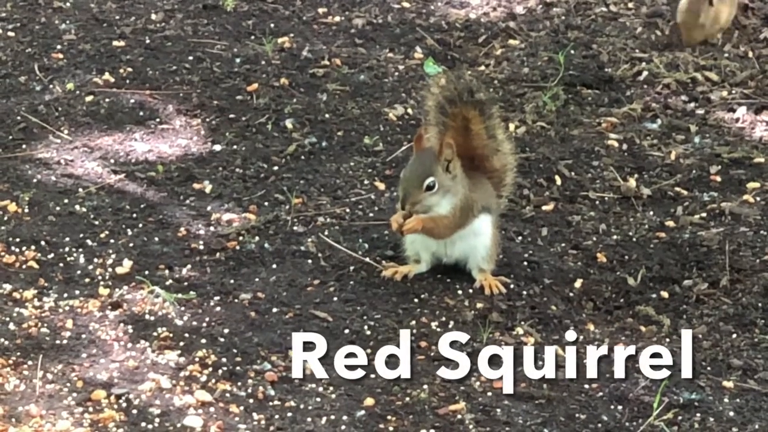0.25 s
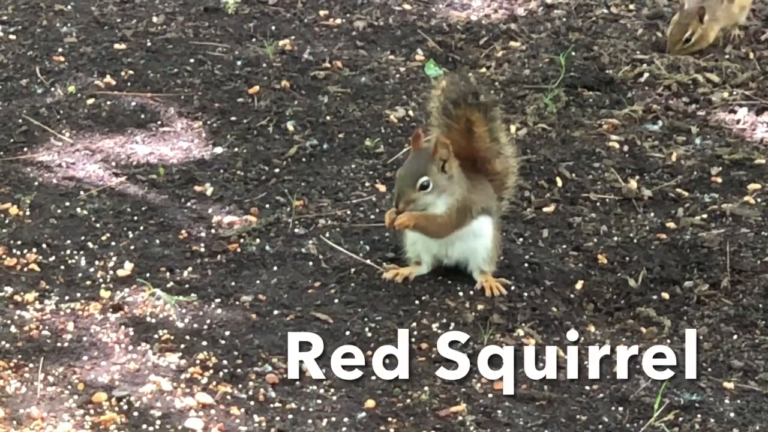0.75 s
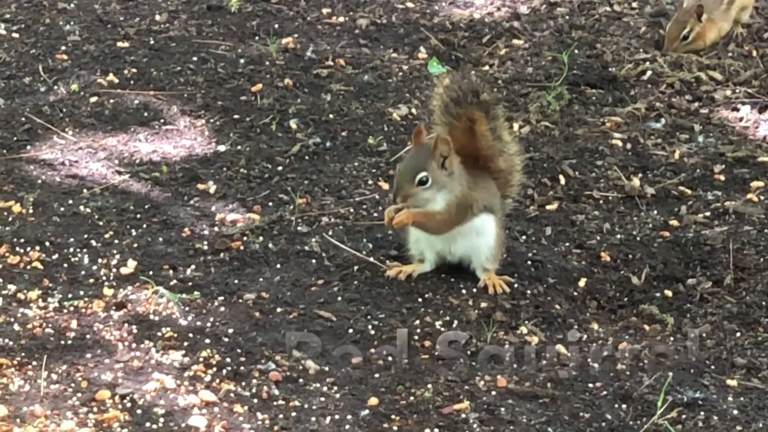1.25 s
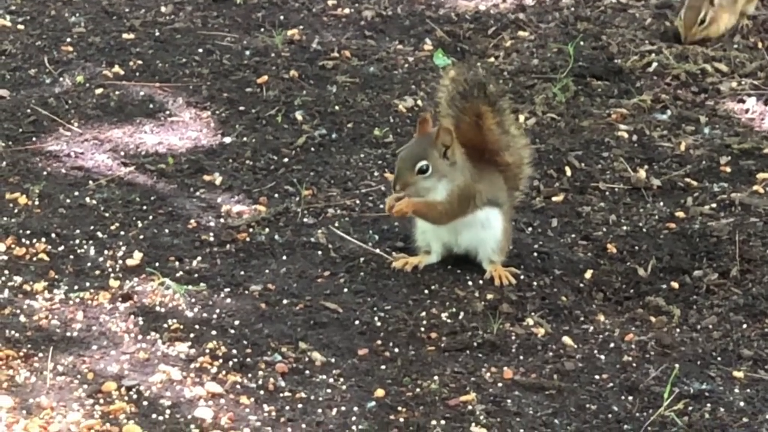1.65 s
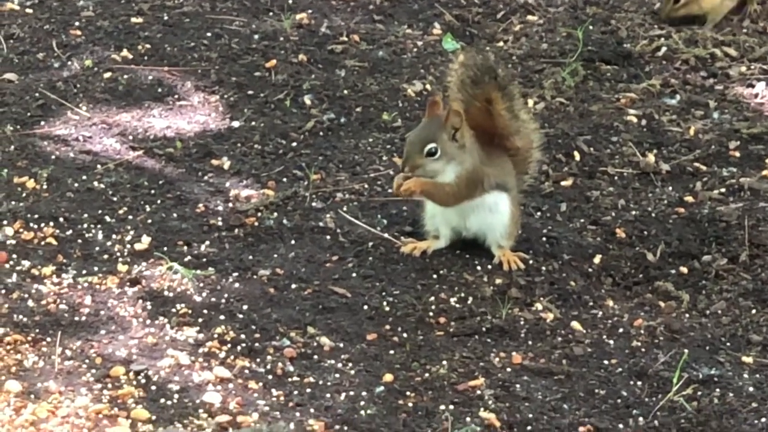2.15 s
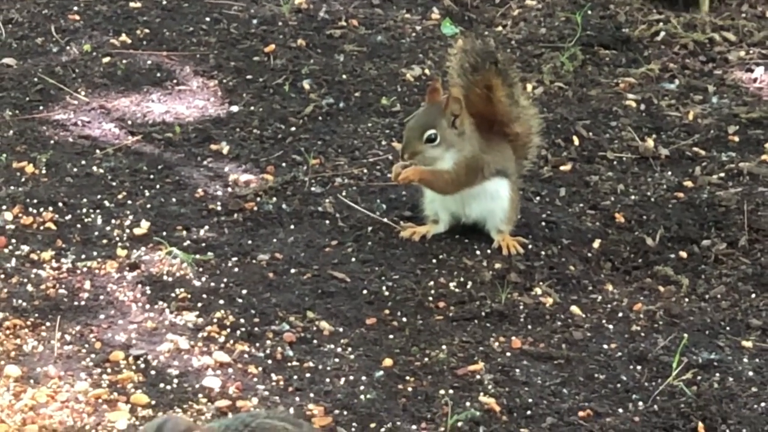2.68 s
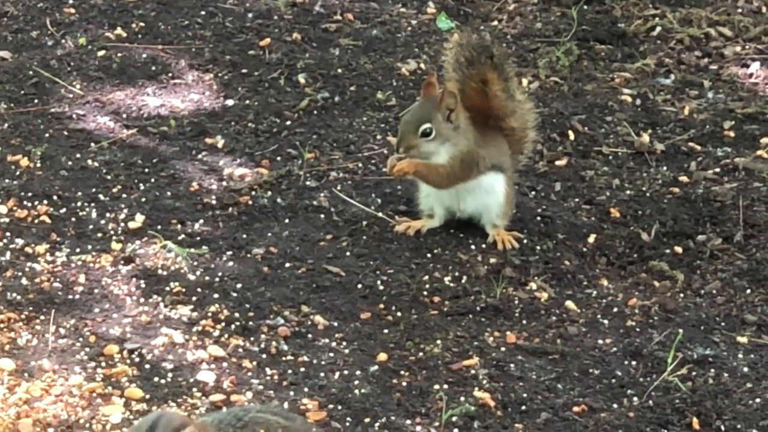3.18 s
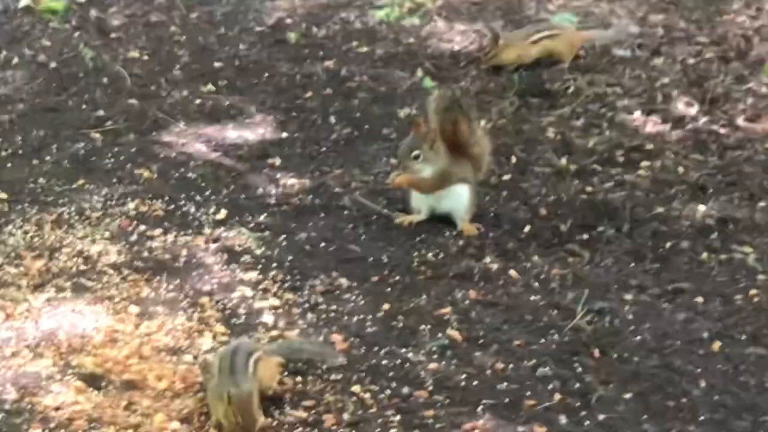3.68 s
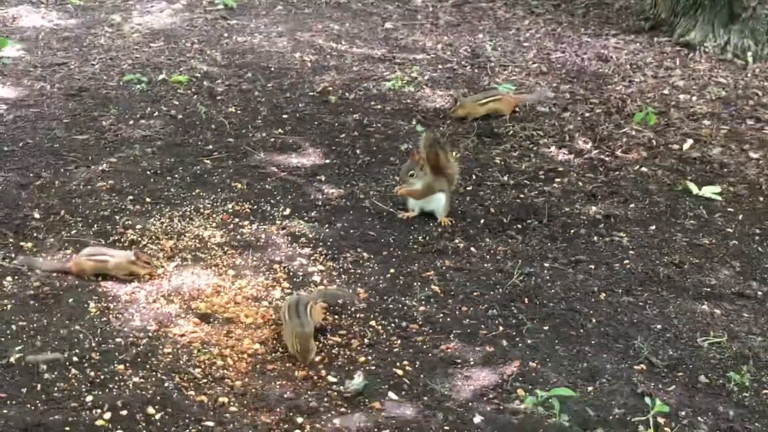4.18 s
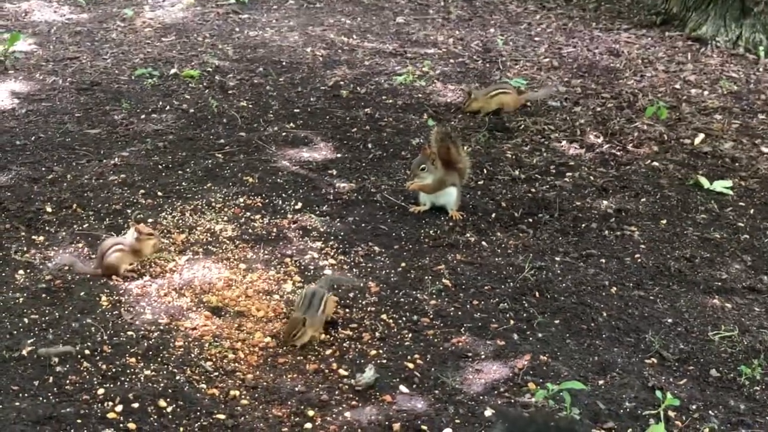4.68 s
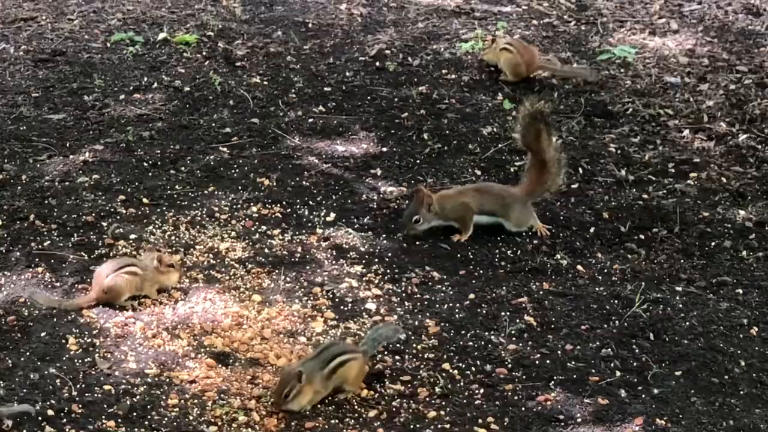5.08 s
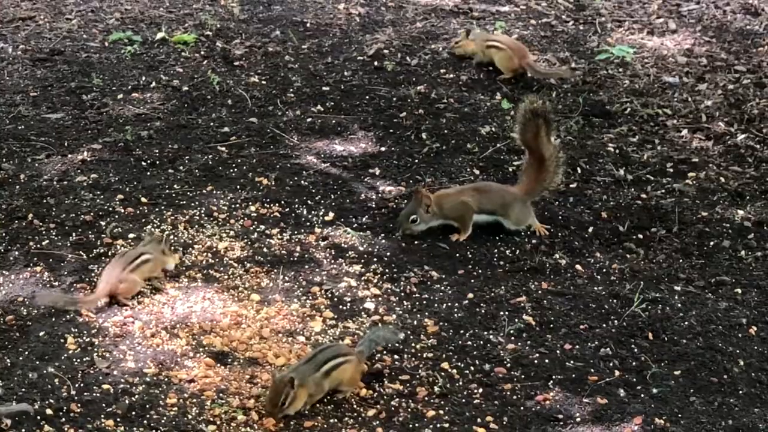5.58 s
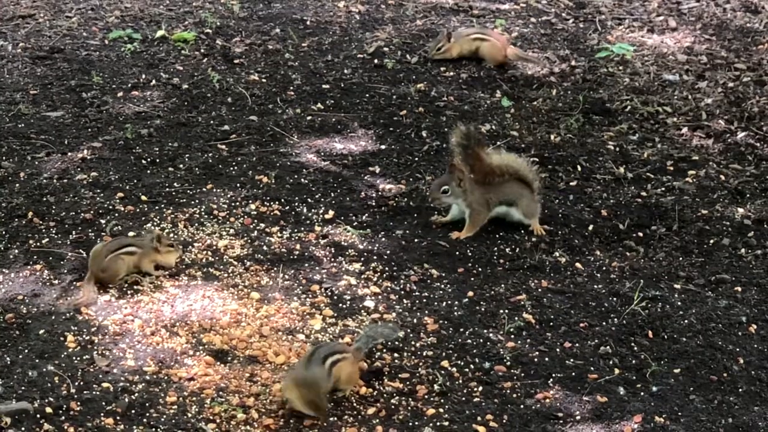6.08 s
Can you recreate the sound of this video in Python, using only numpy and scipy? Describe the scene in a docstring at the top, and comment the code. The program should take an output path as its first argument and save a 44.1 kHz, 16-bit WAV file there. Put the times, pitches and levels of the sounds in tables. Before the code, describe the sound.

A quiet outdoor yard has a soft low wash, faint distant traffic drone and scattered echoes from trees. From 0 to 1.6 s, far jays give short, faint rising calls. A soft chirp at 0.4 s leads into close squirrel chatter from 0.5 to 2.2 s: throaty, raspy groups of two to five pulses, about six groups a second, with increasingly hissy puffs. Dry litter rustles near 0.9 s. A near jay screams harshly at 2.1 s, sagging slightly in pitch. Thin, wavering songbird whistles are scattered between 1.7 and 3.9 s, with crisp rustling at 2.7 and strongest near 4 s. The jay screams again at 4.3 s and at 4.9 s, the last chopped at 5.05 s as the ambience dips, then recovers. From 5.6 s to the end near 6.3 s, louder, quicker squirrel chatter alternates tiny clipped pulses with rattling bursts and brief high squeaks.

```python
"""Squirrel chatter and jay screams in a yard

A squirrel chatters close by: strings of short throaty tone pulses with rasp and puffs of air.
A jay screams three times, as two beating stacks of harmonics; a splice cuts the third near its end.
Far off, jays call shortly, songbirds whistle, one faint low note may be a jay; paws rustle the litter.
An outdoor wash of noise and two drone bands of distant traffic lie beneath; noise tails echo the voices."""
import sys
import numpy as np
from scipy import signal
from scipy.fft import rfft, irfft
from scipy.io import wavfile
from scipy.ndimage import uniform_filter1d

SR = 44100
rng = np.random.default_rng(int(sys.argv[2]) if len(sys.argv) > 2 else 0)


def wav_record(signal):
    """Record a signal, one row per channel, as 16-bit PCM in the file named by sys.argv[1]."""
    frames = np.transpose(np.atleast_2d(signal))
    bounded = np.clip(frames, -1, 1)
    # unit amplitude maps onto the largest positive 16-bit level
    quanta = np.round(bounded * 32767).astype(np.int16)
    wavfile.write(sys.argv[1], SR, quanta)


N = 279594  # samples

SPLICE_S, EDGE_HZ = 5.05, 15800


def amp(db):
    """Amplitude factor of a level in dB."""
    return 10 ** (np.asarray(db) / 20)


def evened(x):
    """Scales to rms 1."""
    return x / np.sqrt(np.mean(x ** 2) + 1e-20)


def read(points, hz):
    """Interpolates a (hz, value) table over log frequency."""
    point_hz, value = np.transpose(points)
    return np.interp(np.log(hz + 1), np.log(point_hz + 1), value)


def add(mix, start_s, sound):
    """Adds a sound to the mix in place, clipped at the mix's end."""
    part = mix[round(start_s * SR):][:len(sound)]
    part += sound[:len(part)]


def noise(colour):
    """Steady noise of the given spectrum, rms 1."""
    spectrum = rfft(rng.standard_normal(N)) * amp(read(colour, np.fft.rfftfreq(N, 1 / SR)))
    return evened(irfft(spectrum, N))


def drift(n, span_s):
    """Smooth random curve of unit spread: white noise averaged twice over the span."""
    span = max(round(span_s * SR), 2)
    smooth = uniform_filter1d(uniform_filter1d(rng.standard_normal(n), span), span)
    return smooth * np.sqrt(1.5 * span)


def stack(pitch_hz, orders):
    """Harmonics (multiple, level_db) of a pitch curve, rms 1."""
    turns = np.cumsum(pitch_hz) / SR
    return evened(sum(amp(db) * np.sin(2 * np.pi * round(k) * turns) for k, db in orders))


# outdoor wash, relative spectrum: frequency_hz, level_db_per_hz
AIR_SPECTRUM = [(18, -38), (30, -8), (112, 0.5), (319, -12), (461, -15.5), (888, -19), (1850, -24.5),
                (2470, -30.5), (3130, -27.5), (3480, -27.5), (16000, -43)]
# traffic drone resonances: centre_hz, width_hz, level_db
DRONE_BANDS = [(91, 31, -53), (192.4, 21, -53)]


def yard():
    """Outdoor wash that swells slowly, with two drone bands that noise excites and so makes waver."""
    hz, white = np.fft.rfftfreq(N, 1 / SR), rfft(rng.standard_normal(N))
    drone = np.zeros(N)
    for centre_hz, width_hz, level_db in DRONE_BANDS:
        resonance = 1 / (1 + ((hz - centre_hz) / (width_hz / 2)) ** 2)
        drone += amp(level_db) * evened(irfft(white * resonance, N))
    wash_db = -43.5 + 0.6 * drift(N, 0.1)
    return amp(wash_db) * noise(AIR_SPECTRUM) + drone


# far notes: songbird whistles, and one faint low note that may be a jay; levels before veiling:
# start_s, length_s, level_db, early_hz, late_hz
FAR_NOTES = [(1.651, 0.11, -58, 3580, 3580), (1.878, 0.11, -50, 3540, 3820), (2.373, 0.18, -58, 6940, 6970),
             (2.467, 0.072, -50, 2860, 2720), (2.602, 0.12, -54, 2316, 2233),
             (2.608, 0.092, -48, 3310, 3810), (2.683, 0.026, -44.5, 3840, 3150),
             (2.859, 0.11, -53.5, 2840, 2420), (3.073, 0.093, -46.5, 3750, 2750),
             (3.23, 0.092, -45, 2646, 1866), (3.65, 0.12, -42, 2980, 2933), (3.677, 0.19, -45, 2800, 2390),
             (2.6, 0.19, -55, 1720, 1690), (6.048, .07, -60, 7270, 7100), (6.18, .07, -60, 4500, 4400),
             (3.791, 0.04, -47.5, 3665, 3700)]


def far_notes():
    """Burry whistles, one sine each; leaves and moving air on the long path make them waver."""
    out = np.zeros(N)
    for start_s, length_s, level_db, early_hz, late_hz in FAR_NOTES:
        u = np.linspace(0, 1, round(length_s * SR))
        glide_hz = late_hz + (early_hz - late_hz) * (1 - u) ** 2.5
        pitch_hz = glide_hz * (1 + 0.012 * drift(len(u), 0.004))
        level = amp(level_db + drift(len(u), 0.0016))
        add(out, start_s, level * stack(pitch_hz, [(1, 0)]) * signal.windows.tukey(len(u), 0.4))
    return out


def scream(level_db, low_hz, high_hz, open_db, beak):
    """Two halves of the voice box beat; only the low one has a fundamental, and it leads the upper harmonics."""
    n = len(low_hz)
    out = np.zeros(n)
    for pitch_hz, first in ((low_hz, 1), (high_hz, 2)):
        turns = np.cumsum(pitch_hz * (1 + 0.003 * drift(n, 0.004))) / SR
        for k in range(first, 20):
            upper = k > 2
            wander_db = 2.88 * drift(n, 0.0045)  # each harmonic on its own
            side_db = (open_db - 0.63 * k * (first - 1)) * upper
            db = read(beak, k * pitch_hz) + wander_db + side_db
            blur = 0.09 * k * upper * drift(n, 0.0025)  # high harmonics dissolve into rasp
            out += amp(db) * np.sin(2 * np.pi * k * turns + blur) * (k * pitch_hz < EDGE_HZ)
    return amp(level_db) * out


# far jay calls, levels before the beak response: start_s, length_s, level_db, early_hz, late_hz
FAR_CALLS = [(0.033, 0.075, -61, 801, 846), (0.257, 0.12, -58.5, 777, 862), (0.398, 0.066, -58, 740, 773),
             (0.71, 0.079, -56.5, 771, 786), (1.079, 0.08, -55.5, 712, 768), (1.247, 0.058, -56, 721, 770),
             (1.436, 0.062, -60.5, 766, 785), (1.562, 0.08, -59, 748, 825)]
# far jays' harmonic response: frequency_hz, level_db
FAR_BEAK_RESPONSE = [(780, -5.5), (1600, 9), (2350, -2), (3150, 10.5), (4000, -4.5), (4800, -1.5),
                     (6500, -4), (8000, -23)]


def far_jays():
    """Short rising screams, the beak response held fixed."""
    out = np.zeros(N)
    for start_s, length_s, level_db, early_hz, late_hz in FAR_CALLS:
        low_hz = np.linspace(early_hz, late_hz, round(length_s * SR))
        call = scream(level_db, low_hz, 1.045 * low_hz, 0, FAR_BEAK_RESPONSE)
        add(out, start_s, call * signal.windows.tukey(len(low_hz), 0.6))
    return out


# moves in the litter, before smoothing: peak_s, peak_db, rise_s_per_20db, fall_s_per_20db
LITTER_MOVES = [(.89, -45, .045, 0.055), (.945, -46, 0.041, 0.055), (1.059, -51, 0.09, 0.97),
                (1.93, -53.5, 0.5, 0.75), (2.455, -53, .025, 0.043), (2.68, -45.5, 0.081, 0.18),
                (3.655, -47.5, 0.0081, 0.015), (3.87, -62, 0.043, 0.22), (3.96, -39.5, 0.098, 0.061),
                (4.035, -54.5, 0.087, 0.081), (4.18, -52.5, 0.16, 0.28), (4.265, -51, 0.078, .3),
                (4.44, -50, 0.24, .02), (5.18, -56, 0.21, .22)]
# dry litter, relative spectrum: frequency_hz, level_db_per_hz
LITTER_SPECTRUM = [(2060, -19), (3500, -17), (4290, -16.5), (9130, -15), (16000, -24)]


def rustle():
    """Dry litter: dense hiss that crackles unevenly under each move."""
    t = np.arange(N) / SR
    level = np.zeros(N)
    for peak_s, peak_db, rise_s, fall_s in LITTER_MOVES:
        level += amp(peak_db - 20 * np.maximum((peak_s - t) / rise_s, (t - peak_s) / fall_s))
    crackle = evened(noise(LITTER_SPECTRUM) * amp(2.14 * drift(N, 0.0013)))
    return uniform_filter1d(level, 300) * crackle


# near screams, levels before the beak response, pitches before the scoop: start_s, length_s, swell_s,
# level_db, fade_db, low_early_hz, low_late_hz, high_early_hz, high_late_hz
NEAR_SCREAMS = [(2.088, .275, 0.09, -36, -4.5, 860.4, 795, 891, 840),
                (4.256, 0.27, 0.025, -34.5, -7.5, 799.3, 765, 856, 776),
                (4.865, .2, 0.033, -37.5, -2, 861, 798, 897, 850)]
# near jay's harmonic response: frequency_hz, level_db
BEAK_RESPONSE = [(800, -10), (1650, 6), (2450, -12.5), (3300, -12), (4500, -18.5), (5800, -8), (7000, -21),
                 (9000, -33.5), (11500, -22.5), (13500, -30), (15000, -28)]
SWELL_DB, ATTACK_S, RELEASE_S_PER_20DB = -15, 0.0089, 0.006
SCOOP, SCOOP_S = 0.0564, 0.0207  # pitch starts this fraction low and slides up
SHUT_DB, OPENING_S, OPEN_DB = -28, 0.034, 3  # the opening beak frees the upper harmonics


def jay():
    """Near screams: a swell, a slow sag of level and pitch, a quick release."""
    out = np.zeros(N)
    for (start_s, length_s, swell_s, level_db, fade_db,
         low_early_hz, low_late_hz, high_early_hz, high_late_hz) in NEAR_SCREAMS:
        t = np.arange(0, length_s + 3 * RELEASE_S_PER_20DB, 1 / SR)
        u = t / length_s
        scoop = 1 - SCOOP * np.exp(-t / SCOOP_S)
        low_hz = scoop * (low_early_hz + (low_late_hz - low_early_hz) * u)
        high_hz = scoop * (high_early_hz + (high_late_hz - high_early_hz) * u)
        swell_db = SWELL_DB * np.maximum(1 - t / swell_s, 0)
        release_db = -20 * np.maximum(t - length_s, 0) / RELEASE_S_PER_20DB
        db = level_db + swell_db + fade_db * u ** 2 + release_db
        open_db = OPEN_DB + SHUT_DB * np.exp(-t / OPENING_S)
        call = scream(db, low_hz, high_hz, open_db, BEAK_RESPONSE)
        add(out, start_s, call * np.minimum(t / ATTACK_S, 1))
    return out


# chatter syllables, lone pulses being a run-up; puff_db is before PUFF_GAIN_DB: start_s, length_s, pulses,
# level_db, fade_db, opening_hz, settled_hz, closing_hz, pulse_rise_fraction, puff_db
CHATTER = [(0.508, 0.093, 3, -43, 2.5, 680, 556, 592, 0.06, -16),
           (0.676, 0.084, 4, -39, 0, 722, 590, 532, 0.1, -16),
           (0.834, .07, 3, -39, -5, 664, 580, 631, 0.07, -16),
           (1.007, 0.1, 4, -37.5, -0.5, 720, 573, 531, 0.1, -8.5),
           (1.194, 0.13, 5, -39.5, 0.5, 820, 578, 574, 0.09, -4.5),
           (1.38, 0.12, 5, -38.5, 1, 749, 634, 552, 0.14, -4.5),
           (1.55, 0.054, 2, -39, 1, 762, 644, 590, 0, -5), (1.664, 0.09, 3, -40, 1.5, 828, 620, 584, 0, -1),
           (1.82, 0.12, 3, -40.5, 2, 787, 679, 521, 0.04, -7),
           (2.032, 0.14, 3, -39, -0.5, 775, 586, 632, 0.03, -5),
           (5.609, 0.039, 2, -31.5, -9.5, 798, 630, 625, 0, -10),
           (5.651, 0.04, 2, -31.5, -13, 692, 575, 490, 0, -13.5),
           (5.712, 0.013, 1, -41, 0, 560, 540, 540, 0.03, -25),
           (5.727, 0.008, 1, -38, -3, 610, 540, 540, 0.03, -24),
           (5.742, 0.06, 3, -33, -9.5, 843, 610, 494, 0.09, -5),
           (5.843, 0.0072, 1, -36.5, 0, 605, 544, 550, 0.02, -24),
           (5.854, .01, 1, -40, 2, 580, 540, 540, 0.35, -22),
           (5.867, 0.07, 3, -34.5, -10.5, 856, 582, 500, 0.04, -5.5),
           (5.973, 0.012, 1, -42, -3, 600, 545, 540, 0, -28),
           (5.996, 0.064, 3, -34.5, -8, 847, 610, 510, 0.04, -8),
           (6.094, 0.012, 1, -44, 0, 600, 540, 540, 0, -24),
           (6.119, .09, 4, -33.5, -8, 737, 637, 476, 0.07, -9.5),
           (6.248, 0.011, 1, -36, 0, 644, 540, 540, 0, -27),
           (6.268, 0.072, 3, -36.5, -0.5, 886, 636, 538, 0, -6.5)]
STRETCH = 1.2  # pulses lengthen along a syllable
SLACKEN_S = 0.02434  # the throat relaxes from the opening pitch
UNEVEN_DB, UNEVEN_PITCH = 1.0, 0.03  # spread from pulse to pulse
SWELL_IN_DB, SWELL_IN_S = -7, 0.012  # a syllable starts softer
# (before splice, after): afterwards the puffs fade sooner and pulses overlap less
PUFF_FADE_DB, PUFF_FADE_S = (-32, -20), (0.065, 0.023)
OVERHANG_S = (0.0049, 0.00079)


def pulses():
    """Splits syllables into pulses: start_s, syllable_time_s, tension (0-1), pitch_hz, level_db, puff_db."""
    for (start_s, length_s, count, level_db, fade_db,
         opening_hz, settled_hz, closing_hz, rise, puff_db) in CHATTER:
        edges_s = length_s * np.linspace(0, 1, round(count) + 1) ** STRETCH
        bout = int(start_s > SPLICE_S)
        chance = rng.standard_normal((8, 2))
        for a, b, (louder, higher) in zip(edges_s, edges_s[1:], chance):
            t = np.arange(a, b + OVERHANG_S[bout], 1 / SR)
            tension = np.exp(-(t / SLACKEN_S) ** 2)
            slack_hz = settled_hz + (closing_hz - settled_hz) * t / length_s
            glide = 1 + UNEVEN_PITCH * higher + rise * (2 * (t - a) / (b - a) - 1)
            pitch_hz = (slack_hz + (opening_hz - slack_hz) * tension) * glide
            swell_db = SWELL_IN_DB * np.exp(-t / SWELL_IN_S)
            db = level_db + fade_db * t / length_s + swell_db + UNEVEN_DB * louder
            air_db = puff_db + PUFF_FADE_DB[bout] * (1 - np.exp(-a / PUFF_FADE_S[bout]))
            yield start_s + a, t, tension, pitch_hz, db, air_db


# soft single chirps: start_s, length_s, level_db, pitch_hz
SOFT_CHIRPS = [(0.402, 0.11, -46.5, 784), (4.727, 0.032, -44, 783)]
# chirp harmonics, relative: multiple, level_db
CHIRP_HARMONICS = [(1, 0), (2, -8.5), (6, -10)]


def chirps():
    """Soft wavering tones of a few harmonics."""
    out = np.zeros(N)
    for start_s, length_s, level_db, pitch_hz in SOFT_CHIRPS:
        n = round(length_s * SR)
        wavering_hz = pitch_hz * (1 + 0.048 * drift(n, 0.0034))
        tone = stack(wavering_hz, CHIRP_HARMONICS)
        add(out, start_s, amp(level_db) * tone * signal.windows.tukey(n, 0.6))
    return out


# brief squeaks: start_s, peak_db, start_hz
SQUEAK_NOTES = [(5.594, -46, 3500), (5.599, -36, 4100), (5.604, -40, 2940), (5.62, -42, 2700),
                (5.625, -45, 4100), (5.6595, -39.5, 4400), (5.7373, -46, 3860), (5.747, -43, 2390),
                (5.755, -36.5, 1970), (5.754, -43, 3940), (5.874, -41, 2170), (5.881, -34, 2100),
                (5.866, -60, 3800), (5.8816, -42, 4050), (5.999, -61, 3670), (6.267, -45, 4200),
                (6.282, -46, 4440), (6.297, -48, 4360)]


def squeaks():
    """Sine blips of 7 ms that fall about 5 % in pitch."""
    out = np.zeros(N)
    t = np.arange(0, 0.007, 1 / SR)
    for start_s, peak_db, start_hz in SQUEAK_NOTES:
        tone = np.sin(2 * np.pi * start_hz * t * (1 - 3.5 * t))
        add(out, start_s, amp(peak_db) * np.hanning(len(t)) * tone)
    return out


# pulse overtones, relative: multiple, level_db
PULSE_OVERTONES = [(2, 17), (3, 3), (4, 1)]
# relative spectra of throat noise and of puffs, head aside or facing the microphone:
# frequency_hz, level_db_per_hz
RASP_SPECTRUM = [(300, -84), (450, 12.5), (1000, 7), (2100, -12.5), (2900, -16), (4100, -8), (5500, -27)]
PUFF_ASIDE_SPECTRUM = [(2060, -41), (3500, 9), (4930, 7.5), (6560, 14), (16000, -20)]
PUFF_FACING_SPECTRUM = [(2940, -52), (5000, -6), (8870, -1), (12000, 8.5), (13400, 3.5), (16000, -38)]
PULSE_RISE_S, PULSE_FALL_S = 0.0027, 0.0089
PUFF_S, PUFF_GAIN_DB = 0.0031, 10.5


def squirrel():
    """Each pulse is an unsteady tone with hoarser overtones and rasp; air hisses out once a cycle."""
    room = N + SR
    out, unsteady, hoarse = np.zeros(room), drift(room, 0.0034), drift(room, 0.00094)
    rasp = np.resize(noise(RASP_SPECTRUM), room) * amp(1.5 * unsteady)
    aside = np.arange(N) < SPLICE_S * SR
    hiss = np.resize(np.where(aside, noise(PUFF_ASIDE_SPECTRUM), noise(PUFF_FACING_SPECTRUM)), room)
    for start_s, t, tension, pitch_hz, level_db, puff_db in pulses():
        first = round(start_s * SR)
        at, since_s = slice(first, first + len(t)), t - t[0]
        pitch_hz = pitch_hz * (1 + 0.04 * (0.38 + 1.6 * tension) * unsteady[at])
        strain_db = -6 + 12 * np.log2(pitch_hz / 600)  # higher pulses are richer
        fundamental = stack(pitch_hz, [(1, 0)])
        hoarse_hz = pitch_hz * (1 + (0.059 + 0.051 * tension) * hoarse[at])
        overtones = stack(hoarse_hz, PULSE_OVERTONES) * amp(strain_db + 1.2 * hoarse[at])
        throat = amp(strain_db - 1.5 + 6.4 * tension) * rasp[at]
        burst = since_s / PUFF_S
        puff_shape = burst ** 2 * np.exp(-burst * 1.87) + 0.18
        cycle = 1.54 + np.cos(2 * np.pi * np.cumsum(pitch_hz) / SR)
        puff = amp(puff_db + PUFF_GAIN_DB) * hiss[at] * cycle * puff_shape
        attack = np.minimum(since_s / PULSE_RISE_S, 1)
        shape = attack * np.minimum(since_s[::-1] / PULSE_FALL_S, 1) ** 1.04
        voice = fundamental + overtones + throat + puff
        add(out, start_s, amp(level_db) * shape / shape.max() * voice)
    return out[:N] + chirps() + squeaks()


# decay of the scattered sound: frequency_hz, t60_s
SCATTER_DECAY = [(800, 0.58), (1700, 1), (2500, 1.28), (6000, 0.82), (11000, 0.4)]


def echoes(x):
    """Trunks and fences scatter the sound back: a noise tail, each band dying at its own speed."""
    hz, t, bands = signal.stft(rng.standard_normal(SR), SR, nperseg=256)
    decay = amp(-60 * t / read(SCATTER_DECAY, hz)[:, None])
    tail = signal.istft(bands * decay, SR, nperseg=256)[1]
    tail = tail * np.clip(np.arange(len(tail)) / SR / 0.013, 0, 1)  # 13 ms build-up
    return signal.fftconvolve(x, tail / np.linalg.norm(tail))[:N]


def scene():
    """Mixes direct sounds, echoes and yard; past the splice the earlier echoes ring on fainter."""
    near, calls, far, notes = squirrel(), jay(), far_jays(), far_notes()
    before = np.arange(N) < SPLICE_S * SR
    calls = calls * before
    wet = amp(-16) * near + amp(-11) * calls + amp(-10) * far + amp(-2.5) * notes
    early_tails = echoes(wet * before) * np.where(before, 1, amp(-6.5))
    tails = early_tails + echoes(wet * ~before)
    veiled_notes = amp(-7) * notes  # little of the far notes arrives directly
    direct = near + calls + far + veiled_notes + rustle()
    return (direct + tails + yard())[None]


def record(dry):
    """The level halves at the splice and recovers; the capsule drops deep bass; a low-pass limits the band."""
    since_s = np.arange(N) / SR - SPLICE_S
    dip = np.where(since_s < 0, 1, 1 - 0.5 * np.exp(-np.abs(since_s) / 0.13))
    bass_cut = signal.butter(4, 45, "high", fs=SR, output="sos")
    capsule = signal.sosfilt(bass_cut, dry * dip)
    band_limit = signal.firwin(1023, EDGE_HZ, window=("kaiser", 9), fs=SR)
    return signal.oaconvolve(capsule, band_limit[None], "same")


dry = scene()
out = record(dry)
wav_record(out)
```